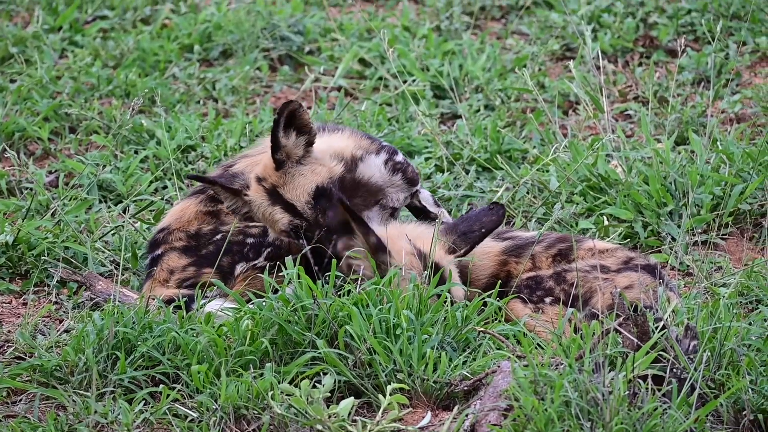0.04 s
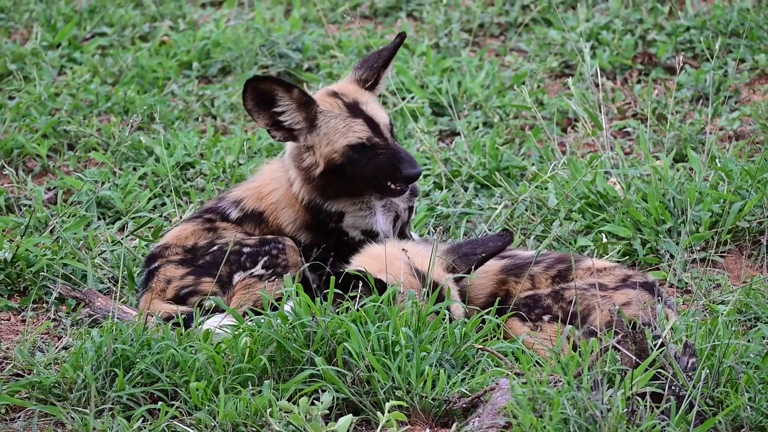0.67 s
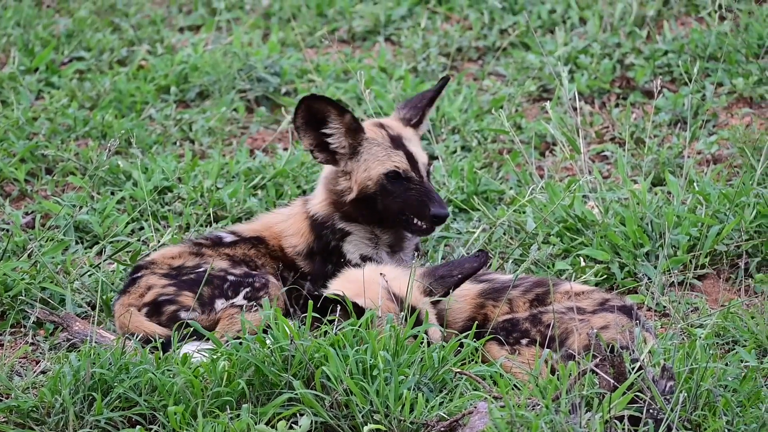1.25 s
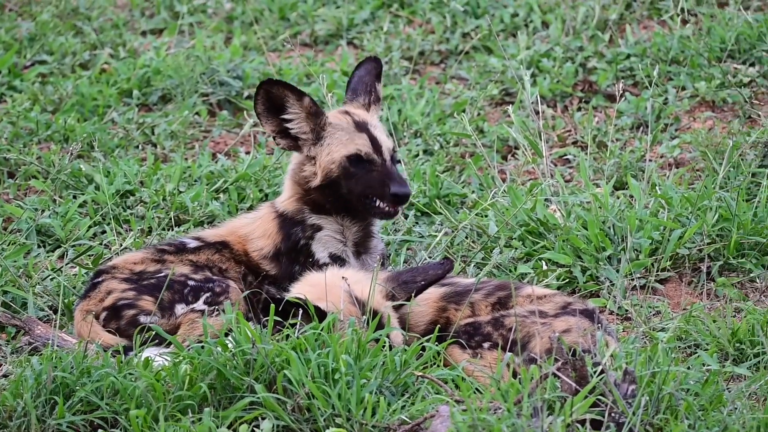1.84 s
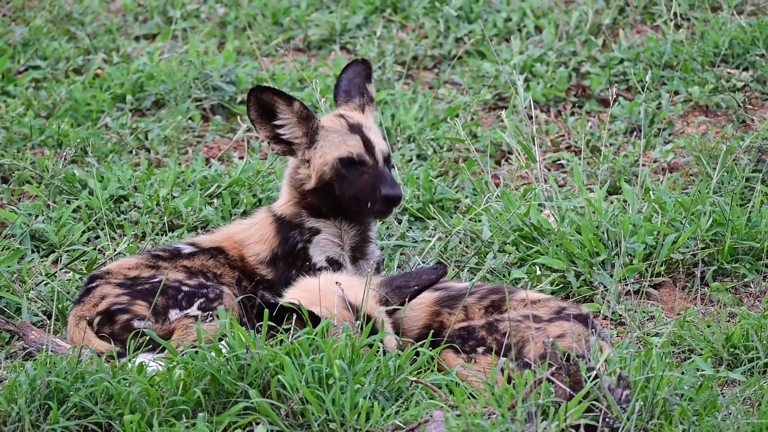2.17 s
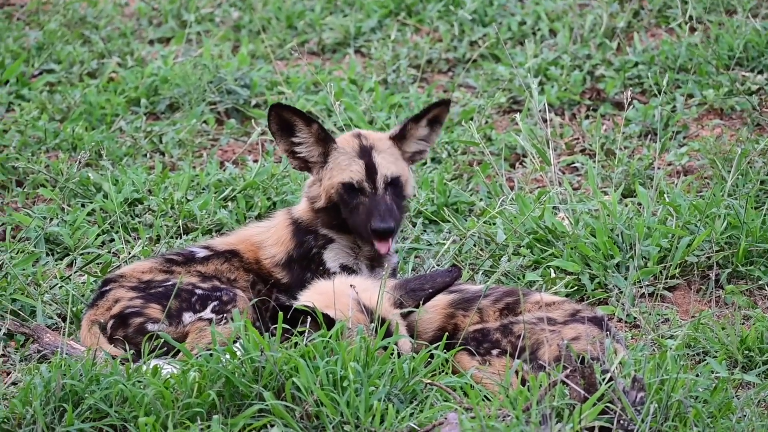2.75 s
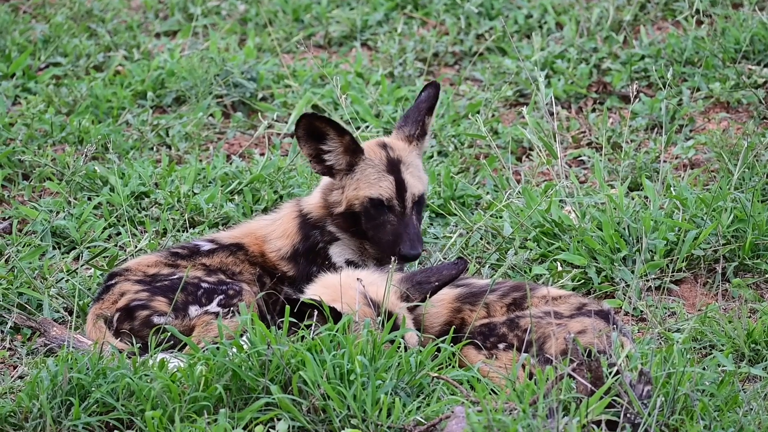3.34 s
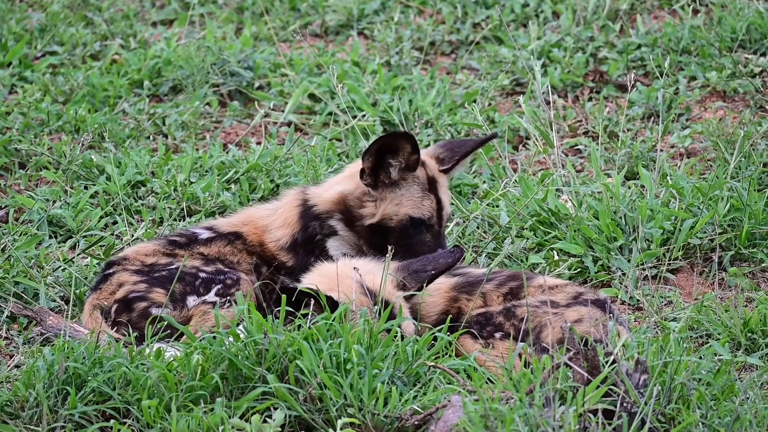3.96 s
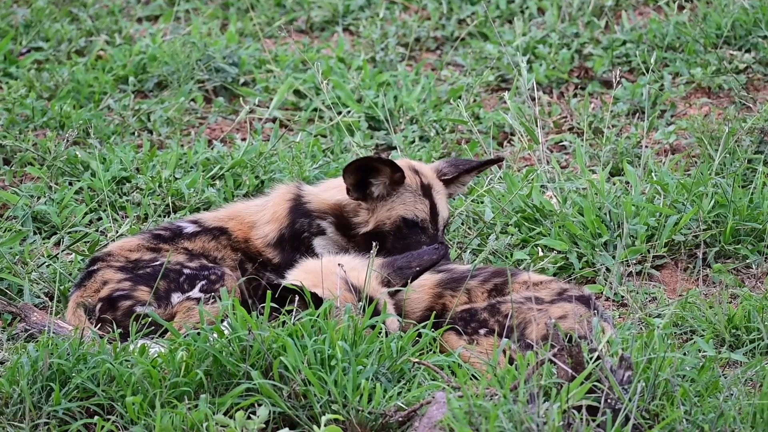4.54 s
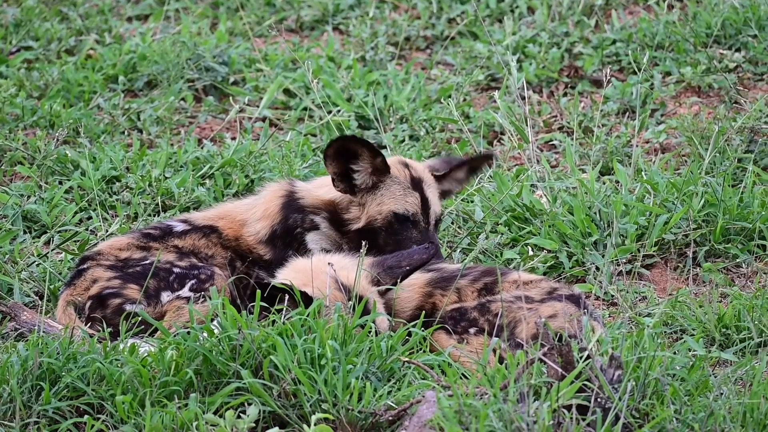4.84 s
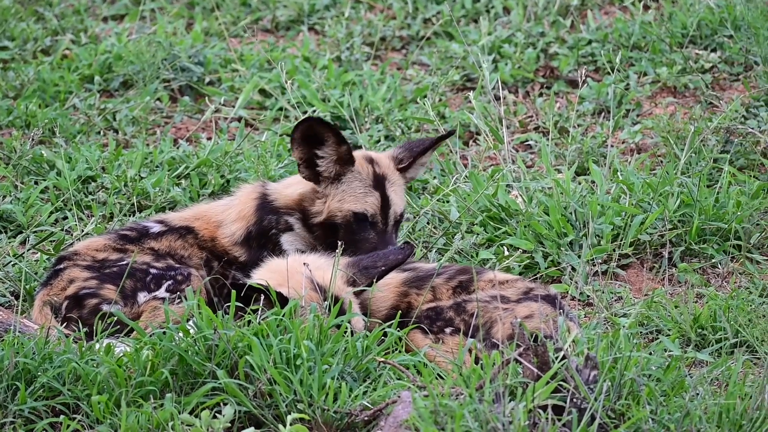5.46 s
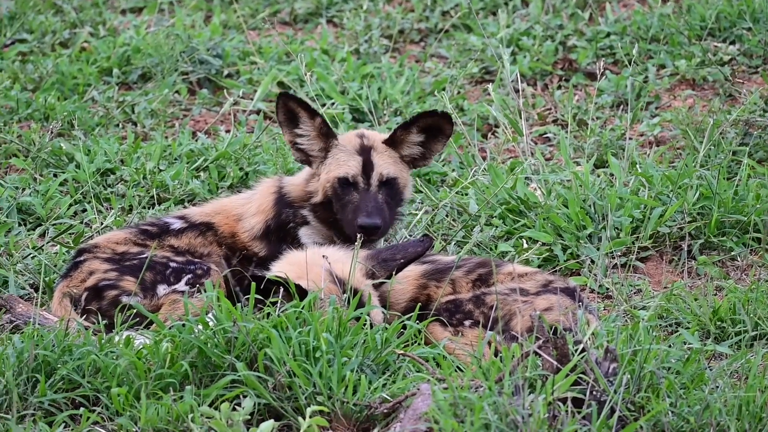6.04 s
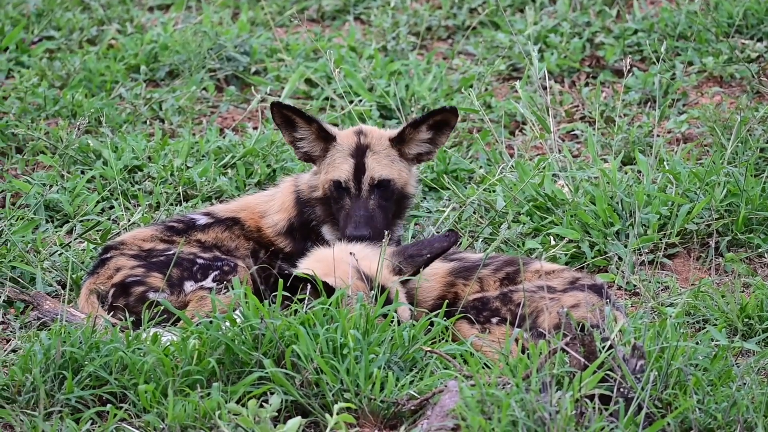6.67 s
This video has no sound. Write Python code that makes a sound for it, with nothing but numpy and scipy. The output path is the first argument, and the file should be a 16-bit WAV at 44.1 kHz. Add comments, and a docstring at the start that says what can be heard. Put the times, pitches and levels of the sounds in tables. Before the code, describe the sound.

In open bush on a still day, a small bird close to a stereo microphone repeats sharp two-stroke chirps, each led by dry ticks. Another answers faintly from the shrubs, and a third, slightly left, sings thin nasal whines that hook upward. One soft, dull knock comes early. The close bird pauses after the middle and returns at the end. Distant calls, soft air, a low rumble and faint hum lie underneath.

```python
"""Open bush on a still day, heard on a stereo pair. Close by, a small bird repeats a sharp two-stroke
chip, pure sweeps of its syrinx, each led in by a rattle of dry ticks; another answers from the shrubs.
A little to the left, a third sings thin nasal whines that end in an upward hook. Far off, others rasp,
hoot, whistle and twitter. Grass and shrubs scatter every call. Under it all lie soft air, a low rumble,
a faint hum, microphone hiss and one dull knock."""
import sys
import numpy as np
from scipy import signal
from scipy.fft import rfft, irfft, next_fast_len
from scipy.io import wavfile
from scipy.ndimage import uniform_filter1d, map_coordinates

SR = 44100
rng = np.random.default_rng(int(sys.argv[2]) if len(sys.argv) > 2 else 0)


def bounce(signal):
    """Save signal as a 16-bit WAV file at the path given by the first command-line argument."""
    frames = np.transpose(np.atleast_2d(signal))
    limited = np.clip(frames, -1, 1)
    pcm = np.round(limited * 32767).astype(np.int16)
    wavfile.write(sys.argv[1], SR, pcm)


N = 295470

# Spectra of the air, the rumble and the microphone hiss. Each row: frequency in Hz, relative density in dB.
AIR_SPECTRUM = [(94, -64), (160, -23.5), (320, -9), (537, -9.5), (687, -12.5), (1090, -12.5), (2000, -18),
                (2720, -18), (3150, -20), (3890, -21.5), (8000, -27), (10400, -47), (17600, -120)]
RUMBLE_SPECTRUM = [(18, -10), (28, -3.5), (42, 6), (52, 3.5), (62, 2), (78, 1), (92, 3.5), (110, -5),
                   (135, -2.5), (170, -5), (260, -6), (440, -58)]
HISS_SPECTRUM = [(4000, -14), (7500, -2), (9000, 0), (12000, -1.7), (15500, -3.5)]
# Slow drift of the rumble. Each row: time in seconds, level in dB.
RUMBLE_LEVEL = [(0, -60.5), (.9, -60.5), (1.4, -61), (2.3, -60.5), (3.0, -61), (5.6, -62), (6.7, -60.5)]
# Tones of the hum. Each row: frequency in Hz, level in dB.
HUM_TONES = [(48.7, -65.5), (98, -78), (122, -70.5)]
# How alike the background is at the two microphones. Each row: frequency in Hz, correlation.
MIC_COHERENCE = [(30, .94), (60, .72), (125, .2), (250, 0), (500, .15), (1500, .03), (15000, 0)]
# Hoarse calls far off. Each row: start and length in seconds, pitch in Hz, relative level in dB.
FAR_RASPS = [(.01, .25, 1720, -68), (0, .1, 2150, -73), (.7, .1, 790, -72), (2.38, .08, 830, -70),
             (5.64, .09, 2560, -71)]
# Notes of the distant calls. Each row: delay and length in seconds, start, middle and end pitch in Hz,
# relative level in dB.
HOOT_CALL = [(0, 0.069, 1100, 1127, 1050, -2.5), (.13, 0.071, 800, 742, 766, -2.5),
             (.21, .06, 1020, 1098, 1080, 1), (.3, 0.041, 755, 731.3, 755, -4.5)]  # four hoots, high and low in turn
SLUR_CALL = [(0, .075, 3004, 2694, 2480, -0.5), (0, 0.0444, 5950, 5540, 5350, -10),
             (.128, .055, 4520, 4054, 3530, -4)]  # a low down-slur with its overtone, then a high one
LONE_WHISTLES = [(1.189, 0.15, 3760, 3310, 3290, -64), (3.53, 0.11, 1658, 2046, 2660, -63.5)]  # delays count from the start of the scene
ANSWER_CALL = [(0, .015, 6800, 4080, 1900, 0), (.083, .042, 1756, 3010, 3818, -4)]  # a slower two-stroke chip
TWITTER_WHISTLE = (0.1, 0.04, 3250, 3380, 3230, -1)  # the single note that ends a twitter
# When those calls are sung. Each row: start in seconds, relative level in dB.
HOOTS = [(.12, -70), (2.62, -69.5), (5.14, -67.5)]
SLURS = [(.39, -67.5), (.812, -65.5), (4.894, -67.5), (5.369, -65.5)]
ANSWERS = [(2.235, -54), (2.62, -56.5), (3.805, -57.5), (4.195, -53.5), (4.59, -52.5)]
TWITTERS = [(5.692, -62.5), (5.802, -62), (5.903, -60), (5.993, -65.5)]
# The close bird's chips. Each row: start, nominal plunge length and swoop delay in seconds, nominal top
# pitch in Hz, relative levels of the swoop and of the rattle before it in dB.
CHIPS = [(.2237, 0.016, 0.035, 4010, -35.5, -39), (0.6317, .0215, .038, 4170, -32.5, -36.5),
         (1.0856, 0.01886, .0365, 3933, -31, -57.5), (1.3323, 0.02013, 0.043, 4050, -31.5, -42),
         (1.5577, 0.019, 0.0441, 4100, -34.5, -38.5), (1.7869, .0165, 0.0438, 4320, -32.5, -43),
         (2.0232, 0.02, 0.04306, 3960, -33.5, -41), (2.2484, 0.01906, 0.042, 4120, -31.5, -38.5),
         (2.5232, 0.018, 0.043, 3960, -31.5, -43), (2.7507, 0.019, 0.043, 4111, -35, -39.5),
         (3.0236, .0191, .0417, 3941, -33.5, -42), (3.253, 0.021, 0.04246, 3880, -32.5, -39),
         (3.4619, 0.026, 0.044, 3770, -30.4, -36.5), (3.698, .021, .0408, 4121, -32, -40.5),
         (6.3364, 0.015, 0.035, 3995, -38.8, -37.5), (6.5645, 0.014, 0.04, 3970, -33, -41)]
# Rattles with no chip after them. Each row: start in seconds, relative level in dB.
STRAY_RATTLES = [(.3665, -39), (.8233, -39.5), (.884, -43.5)]
# Modes of the knock. Each row: frequency in Hz, relative level in dB, seconds to fall by 60 dB.
KNOCK_MODES = [(402, -67, 0.2), (520, -76, 0.09), (904, -64, 0.078), (1240, -61.5, 0.069)]
# The nasal song. Each row: start, drawl length and hook length in seconds, top pitch in Hz, relative
# levels of the drawl and the hook in dB.
WHINES = [(1.643, 0.17, 0.048, 2460, -55, -39), (1.976, .143, 0.066, 2420, -55.5, -37),
          (2.348, 0.13, 0.065, 2533, -53, -37), (5.746, 0.15, 0.059, 2527, -53, -39),
          (6.09, .145, 0.063, 2544, -53.5, -40), (6.458, 0.1382, 0.058, 2705, -53, -36.5)]
# Tone colours. Each row: frequency in Hz, gain in dB.
TICK_COLOUR = [(800, -18), (1800, -6.5), (3200, -5.5), (5000, 0), (6300, 1), (7500, -8.5), (9000, -21),
               (15000, -35.5)]  # a dry snap
CHIP_COLOUR = [(1300, -26), (1600, 4), (1850, -3.5), (2400, -2.5), (2850, -1.5), (3100, 8), (3450, -4),
               (3750, 3.5), (4300, -4.5), (4650, 4), (5400, -3), (6000, -6), (6600, -4.5)]  # the chip's path over the ground
WHINE_THROAT = [(1500, -52.5), (3200, -19.5), (4000, -14), (4700, 0.5), (5200, 1.5), (5700, -0.5),
                (6300, -4.5), (6900, -12), (7800, -13.5), (11000, -50)]  # the singer's throat resonance
RASP_COLOUR = [(2500, -30), (3700, -10), (4200, 2.5), (4900, -8.5), (5900, 3), (6400, -12), (7000, -11.5),
               (9000, -34)]  # the hoarse noise in its drawl
LEAF_SCATTER = [(700, 5), (1800, -2), (3000, 0), (4500, 3), (6500, 5.5)]  # echoes off the leaves
# The tail from the bush. Each row: frequency in Hz, seconds to fall by 60 dB.
BUSH_DECAY = [(800, 1), (2000, 0.6), (3700, 0.53), (6000, 0.56), (10000, 0.1)]


def amp(db):
    """Decibels to gain."""
    return 10 ** (np.asarray(db) / 20)


def unit(x):
    """Scale to rms 1."""
    return x / np.sqrt(np.mean(x ** 2) + 1e-20)


def along(points, hz):
    """Read (Hz, value) points on a log frequency axis."""
    knots_hz, values = np.transpose(points)
    return np.interp(np.log(np.abs(hz) + 1), np.log(knots_hz + 1), values)


def wobble(rate, size=N):
    """A smooth random curve with rate knots a second."""
    knots = rng.standard_normal(int(size * rate / SR) + 4)
    return map_coordinates(knots, [np.arange(size) * rate / SR], mode="nearest")


def filtered(x, response):
    """Pass x through a response given as a function of Hz."""
    size = next_fast_len(N + 8192)
    return irfft(rfft(x, size) * response(np.fft.rfftfreq(size, 1 / SR)), size)[..., :N]


def coloured(x, colour):
    """Filter x by a table of (Hz, dB) points."""
    return filtered(x, lambda hz: amp(along(colour, hz)))


def add(track, start, sound):
    """Mix a sound into a track at start seconds."""
    i = max(round(start * SR), 0)
    part = track[..., i:i + sound.shape[-1]]
    part += sound[..., :part.shape[-1]]


def progress(length):
    """0 to 1 over a note of length seconds."""
    return np.linspace(0, 1, max(round(length * SR), 16))


def fade(u, rise, fall):
    """Smooth ends; rise and fall are shares of the note."""
    onset = np.sin(np.pi / 2 * np.clip(u / rise, 0, 1)) ** 2
    return onset * np.sin(np.pi / 2 * np.clip((1 - u) / fall, 0, 1)) ** 2


def arc(u, start, middle, end):
    """A parabola through three pitches."""
    return np.polyval(np.polyfit([0, .5, 1], [start, middle, end], 2), u)


def phase(hz):
    """Running phase of a gliding tone."""
    return 2 * np.pi * np.cumsum(hz) / SR


def glides(notes, rise, fall):
    """Pure gliding notes, slightly unsteady in pitch."""
    out = np.zeros(N)
    for start, length, *pitches, db in notes:
        u = progress(length)
        hz = arc(u, *pitches) * (1 + .005 * wobble(300, len(u)))
        add(out, start, amp(db) * unit(fade(u, rise, fall) * np.sin(phase(hz))))
    return out


def repeated(call, times):
    """The notes of one call, sung at each (seconds, dB)."""
    return [(start + delay, *shape, db + note_db) for start, db in times for delay, *shape, note_db in call]


def stereo_noise(spectrum, patchy_db):
    """Slightly patchy noise of rms 1, alike at both microphones only in the bass."""
    def mid_and_side(hz):
        angle = np.arccos(np.clip(along(MIC_COHERENCE, hz), -1, 1)) / 2
        return amp(along(spectrum, hz)) * [np.cos(angle), np.sin(angle)]

    bins = signal.stft(rng.standard_normal((2, N)), nperseg=512)[2]
    patches = uniform_filter1d(rng.standard_normal(bins.shape[1:]), size=6, axis=0)
    patches = unit(uniform_filter1d(patches, size=14, axis=1))
    pair = signal.istft(bins * amp(patchy_db * patches), nperseg=512)[1][:, :N]
    mid, side = filtered(pair, mid_and_side)
    return unit(np.array([mid + side, mid - side]))


def background(air_db=-63, hiss_db=-71, swell_db=0.9):
    """Soft air all round, microphone hiss, a gently swelling low rumble and a wavering hum."""
    rumble_db = np.interp(np.arange(N) / SR, *np.transpose(RUMBLE_LEVEL))
    rumble = amp(rumble_db + swell_db * wobble(5.5)) * stereo_noise(RUMBLE_SPECTRUM, patchy_db=0.28)
    hum = sum(amp(db + 1.5 * wobble(5)) * unit(np.sin(phase(hz * (1 + .018 * wobble(7)))))
              for hz, db in HUM_TONES)
    air = amp(air_db) * stereo_noise(AIR_SPECTRUM, patchy_db=0.05)
    hiss = amp(hiss_db) * stereo_noise(HISS_SPECTRUM, patchy_db=1.5)
    return air + hiss + rumble + hum


def far_rasps(width=0.18):
    """Hoarse calls a long way off: narrow bands of noise around a pitch."""
    out = np.zeros(N)
    for start, length, hz, db in FAR_RASPS:
        u = progress(length)
        turn = phase(np.full(len(u), hz))
        band = wobble(width * hz, len(u)) * np.sin(turn) + wobble(width * hz, len(u)) * np.cos(turn)
        add(out, start, amp(db) * unit(fade(u, 0.047, 0.5) * band))
    return out


def far_songs(flick_gap_s=0.016, flick_s=0.0073, flick_hz=(3770, 3270, 2154)):
    """Hoots, slurs, whistles and twitters across the clearing; a twitter opens with three quick flicks."""
    notes = repeated(SLUR_CALL, SLURS) + repeated(HOOT_CALL, HOOTS)
    notes += repeated([TWITTER_WHISTLE], TWITTERS) + list(LONE_WHISTLES)
    flicks = [(k * flick_gap_s, flick_s, *flick_hz, 0) for k in range(3)]
    return glides(notes, rise=0.14, fall=.4) + glides(repeated(flicks, TWITTERS), rise=.28, fall=0.086)


def rattles(lead_s=.044, gap_s=0.0064, snap_t60=.014, loss_db=2, pan_db=2.0):
    """Three weakening dry snaps at a time, slightly left; most rattles come just before a chip."""
    out, t = np.zeros((2, N)), np.arange(SR // 40) / SR
    decay, pan = amp(-60 * t / snap_t60), amp([[pan_db / 2], [-pan_db / 2]])
    before_chips = [(start - lead_s, db) for start, *_, db in CHIPS]
    for start, db in before_chips + list(STRAY_RATTLES):
        for k in range(3):
            snap = (rng.standard_normal(len(t)) + .8 * rng.standard_normal((2, len(t)))) * decay
            delay = k * gap_s * rng.uniform(.85, 1.15)
            add(out, start + delay, snap * amp(db - k * loss_db + rng.normal(0, 1.24)) * pan)
    return coloured(out, TICK_COLOUR)


def stroke(hz, envelope):
    """One pure sweep of the syrinx, coloured by its path over the ground, at rms 1."""
    turn = phase(hz * (1 + 0.0051 * wobble(306, len(hz))))
    return unit(envelope * amp(along(CHIP_COLOUR, hz)) * np.sin(turn))


def chips(plunge_hz=(6466, 3317, 1628), swoop_s=.021, usual_db=-30.5, plunge_db=-34.5):
    """The close bird plunges, pauses, then swoops up and levels off; effort shows mostly in the swoop."""
    out = np.zeros(N)
    for start, plunge_s, delay, top_hz, db, _ in CHIPS:
        u = progress(plunge_s + .001)
        plunge = stroke(arc(u, *plunge_hz), fade(u, 0.11, 0.13))
        add(out, start, amp(plunge_db + 0.22 * (db - usual_db)) * plunge)
        u = progress(swoop_s)
        swoop = stroke(arc(u, 1650, 0.796 * top_hz, 1.021 * top_hz), fade(u, 0.1, 0.13))
        add(out, start + delay, amp(db - 0.54) * swoop)
    return out


def knock(start=1.515, thud_t60=.11, cutoff_hz=1300):
    """One soft, dull knock in the centre: a few short modes over a low thud."""
    ring, thud, t = np.zeros(N), np.zeros(N), np.arange(SR // 5) / SR
    for hz, db, t60 in KNOCK_MODES:
        add(ring, start, amp(db + 9 - 60 * t / t60) * np.sin(2 * np.pi * hz * t))
    add(thud, start, amp(-41 - 60 * t / thud_t60) * rng.standard_normal(len(t)))
    return ring + filtered(thud, lambda hz: 1 / (1 + (hz / cutoff_hz) ** 4))


def whines(drawl_hz=(1410, 1570, 1660), push_db=5):
    """A hoarse drawl climbs, clears and hooks upward; harmonics light up crossing the throat resonance."""
    out, rasp_envelope = np.zeros(N), np.zeros(N)
    for start, drawl_s, hook_s, top_hz, drawl_db, hook_db in WHINES:
        u = progress(drawl_s + hook_s)
        t = u * (drawl_s + hook_s)
        climb, hook = np.clip(t / drawl_s, 0, 1), np.clip((t - drawl_s) / hook_s, 0, 1)
        pitch = arc(climb, *drawl_hz)
        pitch += (top_hz - pitch) * np.sin(np.pi / 2 * hook ** 1.2)
        roughness = .007 + .03 * (1 - climb)
        pitch *= 1 + roughness * wobble(1400, len(u)) + .005 * wobble(110, len(u))
        effort_db = drawl_db - 3 * (1 - climb) + push_db * np.sin(np.pi * hook)
        # Harmonics 2 to 4; the second takes over in the hook.
        levels = [hook_db - 8 * (1 - hook), effort_db, effort_db - 1.5]
        voice = np.zeros(len(u))
        for k, db in enumerate(levels, 2):
            harmonic = np.sin(k * phase(pitch) + rng.uniform(0, 2 * np.pi))
            voice += amp(db + along(WHINE_THROAT, k * pitch)) * harmonic
        envelope = fade(u, .05, .07) * amp(2 * wobble(130, len(u)))
        add(out, start, 1.43 * voice * envelope)
        add(rasp_envelope, start, amp(drawl_db - 1) * envelope * (1 - 0.826 * climb) * (1 - hook))
    return out + rasp_envelope * unit(coloured(rng.standard_normal(N), RASP_COLOUR))


def answers():
    """Deep in the shrubs a second bird replies with a slower plunge and swoop."""
    return glides(repeated(ANSWER_CALL, ANSWERS), rise=0.17, fall=0.265)


def direct(x, pan_db, lead_ms):
    """The straight path: positive pan_db is louder at the left microphone, positive lead_ms earlier."""
    side = np.array([[.5], [-.5]])
    return amp(pan_db * side) * filtered(x, lambda hz: np.exp(2j * np.pi * hz * side * lead_ms / 1000))


def scatter(x, leaf_db, leaf_t60, tail_db):
    """Quick echoes off nearby leaves and a thin tail from the bush; the paths change as the birds move."""
    out = np.zeros((2, N))
    centres, spacing = np.linspace(0, N, 8, retstep=True)
    for centre in centres:
        hz, frame_s, bins = signal.stft(rng.standard_normal((2, SR // 2)), SR, nperseg=256)
        decay = amp(-60 * frame_s / along(BUSH_DECAY, hz)[:, None])
        tail = signal.istft(bins * decay, SR, nperseg=256)[1]
        t = np.arange(tail.shape[1]) / SR
        # The first paths reach both microphones alike.
        shared = .5 * rng.standard_normal(len(t)) * amp(-60 * t / .04)
        leaves = rng.standard_normal(tail.shape) * amp(-60 * t / leaf_t60) + shared
        leaves *= 1 - np.exp(-t / 0.00061)
        echo = (amp(leaf_db) * unit(leaves) + amp(tail_db) * unit(tail)) / np.sqrt(len(t))
        span = np.arange(max(int(centre - spacing), 0), min(int(centre + spacing), N))
        crossfaded = x[span] * (1 - abs(span - centre) / spacing)
        add(out, span[0] / SR, signal.fftconvolve(crossfaded[None], echo, axes=1))
    return coloured(out, LEAF_SCATTER)


def scene():
    """Birds at four distances from the microphones, and one knock, over the quiet background."""
    near, singer = chips(), whines()
    far = far_songs() + far_rasps()
    rattle, answer = rattles(), answers()
    out = direct(near, pan_db=-0.6, lead_ms=0.013)
    out += scatter(near, leaf_db=-2, leaf_t60=0.087, tail_db=-15)
    out += amp(-0.5) * direct(singer, pan_db=3, lead_ms=-0.18)
    out += scatter(singer, leaf_db=-9.5, leaf_t60=0.091, tail_db=-10.5)
    out += amp(-1) * direct(far, pan_db=-1, lead_ms=-.04)
    out += scatter(far, leaf_db=-7, leaf_t60=.08, tail_db=-5)
    out += amp(3) * direct(answer, pan_db=-2.5, lead_ms=-0.18)
    out += scatter(answer, leaf_db=-9.5, leaf_t60=0.086, tail_db=-3.5)
    out += rattle + scatter(rattle[0], leaf_db=-9, leaf_t60=.05, tail_db=-10)
    return out + knock() + background()


def record(dry, top_hz=15740):
    """The recorder keeps nothing above its band limit."""
    return filtered(dry, lambda hz: hz < top_hz)


dry = scene()
out = record(dry)
bounce(out)
```